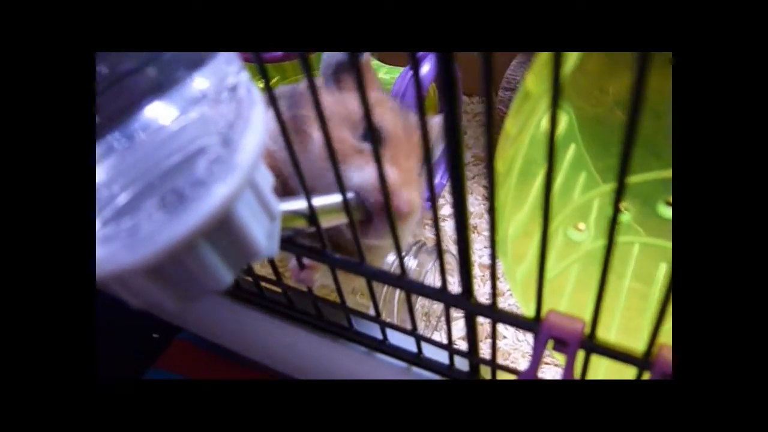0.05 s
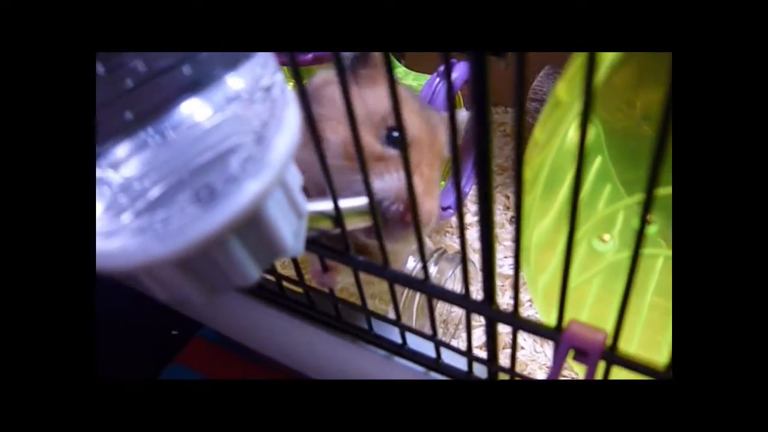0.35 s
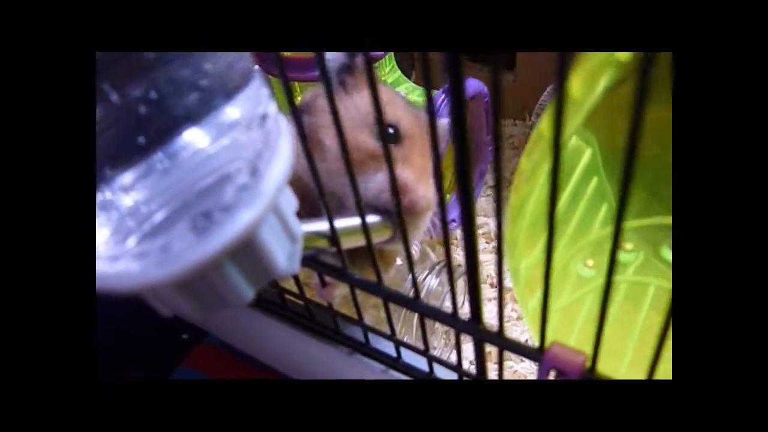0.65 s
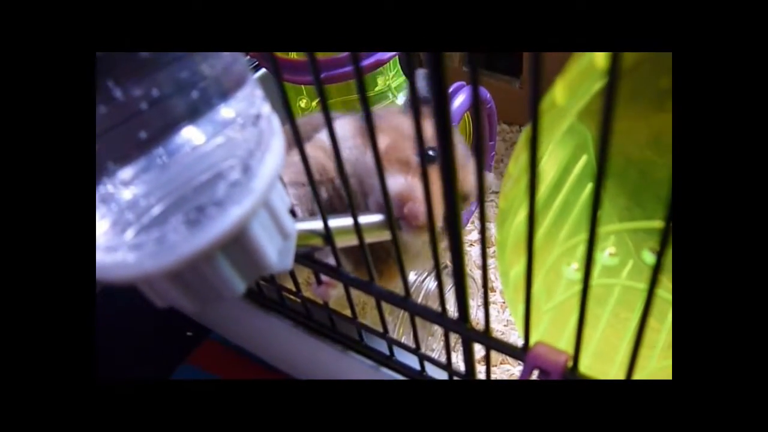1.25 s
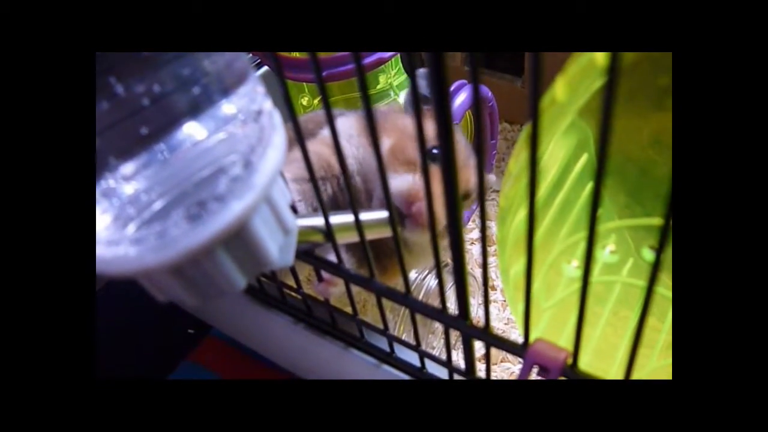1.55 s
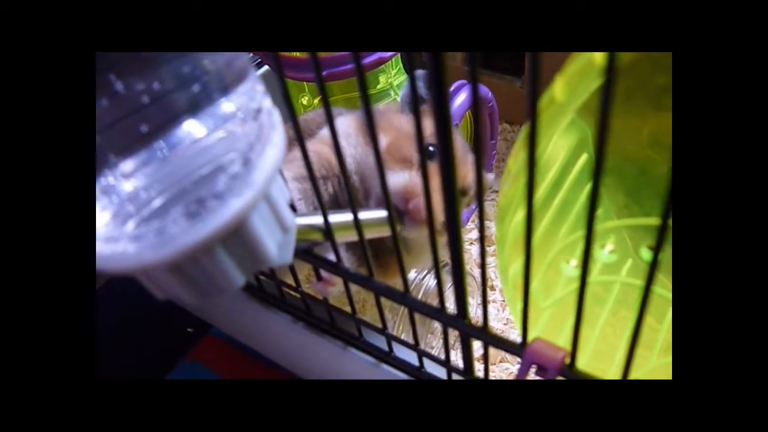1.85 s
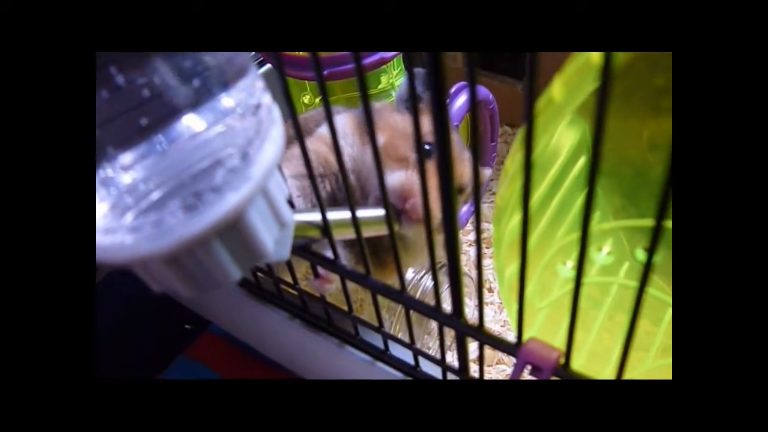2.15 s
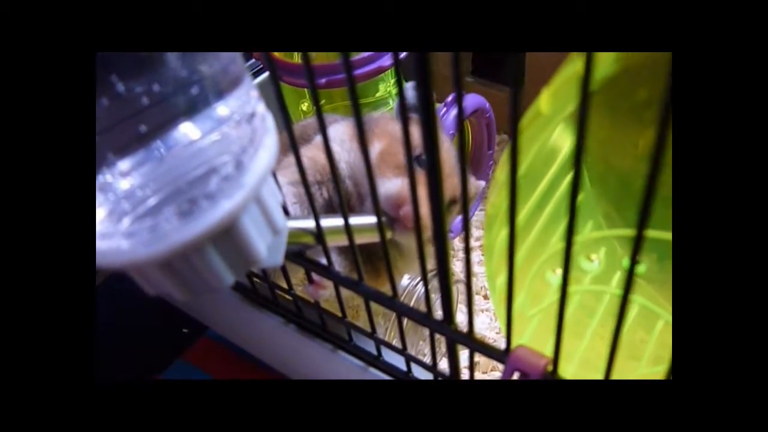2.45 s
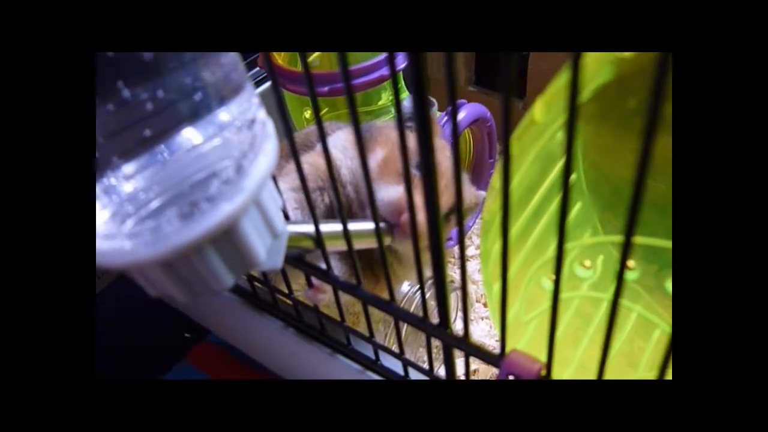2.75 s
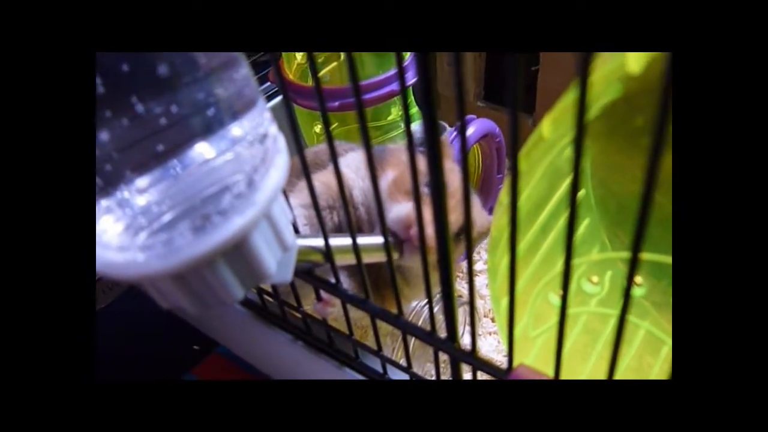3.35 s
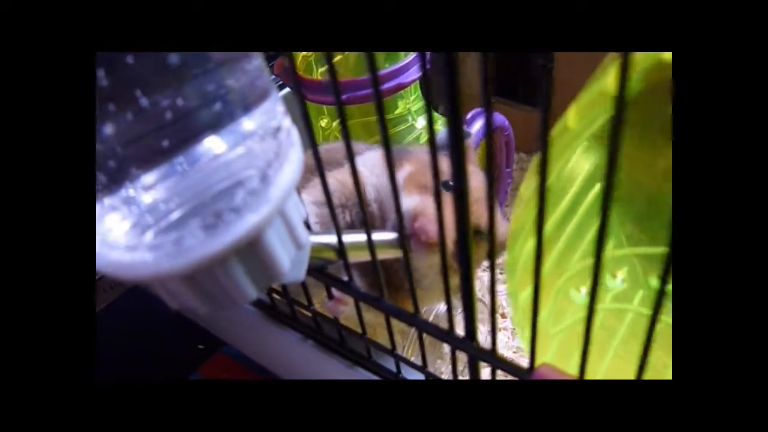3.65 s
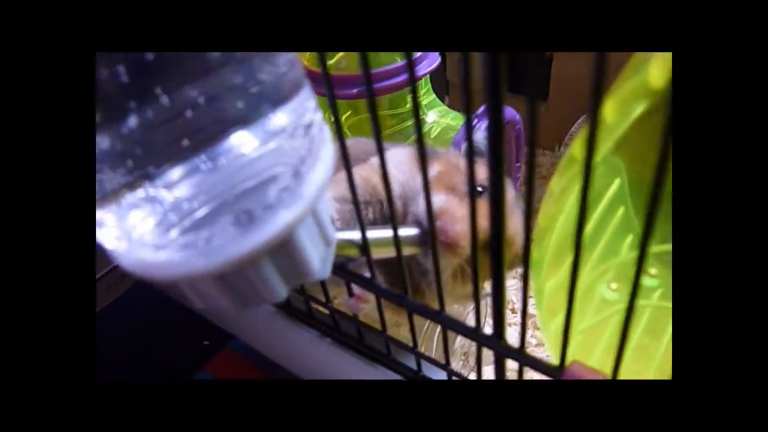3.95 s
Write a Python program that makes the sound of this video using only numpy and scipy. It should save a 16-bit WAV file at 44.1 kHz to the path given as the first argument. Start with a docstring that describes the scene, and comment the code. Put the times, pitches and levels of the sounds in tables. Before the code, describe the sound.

A hamster drinks from a metal bottle spout, with tiny wet ticks, faint rubbing and light irregular knocks that ring the plastic bottle. Soft shuffling at the start fades by about 1.6 seconds. The loudest knock comes near 0.9 seconds. The knocks pause from about 2 to 2.8 seconds while the licking continues, then resume until nearly 4 seconds. Quiet room noise and a very faint electrical whine run underneath.

```python
"""A hamster drinks from the metal spout of a plastic bottle clipped to its cage, in a quiet room.
Room noise, a faint electrical whine and the muzzle rubbing the spout run from the start.
A soft shuffling opens the scene and is gone by 1.64 s as the hamster settles. Over it and after it,
knocks of the spout ring the bottle and its mount, and tongue and teeth make small wet ticks.
The knocks pause from about 2 to 2.8 s while the licking goes on, then resume."""
import sys
import numpy as np
from scipy import signal
from scipy.fft import rfft, irfft
from scipy.io import wavfile

SR = 44100
rng = np.random.default_rng(int(sys.argv[2]) if len(sys.argv) > 2 else 0)


def to_wav(sig):
    """Store sig (one row per channel, or 1-D mono) as 16-bit WAV at the path in sys.argv[1].

    Samples outside -1..1 are clipped; the rate is SR.
    """
    pcm = np.clip(np.atleast_2d(sig), -1, 1) * 32767
    pcm = np.round(pcm).astype(np.int16)
    wavfile.write(sys.argv[1], SR, pcm.T)  # frames by channels


N = 176400
T = np.arange(N) / SR

# plastic bottle (frequency [Hz], level [dB], t60 [s])
BOTTLE_MODES = [(351, -23, 0.079), (518.3, -16, 0.093), (830, -17.5, .02), (958, -18.5, 0.081),
                (1031.4, -11.5, .07), (1142, -9, 0.078), (1156, -5, 0.059), (1280, -19.5, 0.026),
                (1755, -12, 0.078), (1880, -11.5, .07), (2130, -22.5, 0.069), (2698, -19.5, 0.075),
                (3065, -26.5, .03), (3324, -21, 0.052)]
# metal spout (frequency [Hz], level [dB], t60 [s])
SPOUT_MODES = [(3140, -5.5, 0.029), (3350, -10, 0.029), (4570, -7, 0.03), (4660, -7.5, 0.026),
               (4856, -4, 0.025), (4900, -7.5, 0.025), (6350, -14, .035), (6740, -12.5, 0.045)]
# clip and bars holding the bottle (frequency [Hz], level [dB], t60 [s])
MOUNT_MODES = [(463, -5, .08), (590, -7, 0.028), (671, -1.5, 0.065), (746, 3.5, .06), (845, -10.5, 0.031),
               (924, -6.5, 0.033), (1036, -3.5, 0.24)]


def undb(db):
    """Decibels to gain."""
    return 10 ** (np.asarray(db) / 20)


def unit(x):
    """Scale to rms 1."""
    return x / np.sqrt(np.mean(x ** 2))


def decay(t, t60_s):
    """Exponential decay, 60 dB down at t60_s."""
    return np.exp(-np.log(1000) * t / t60_s)


def band(x, hz, width_hz):
    """Two resonators in series, gain 1 at the centre."""
    b, a = signal.iirpeak(min(hz, SR / 3), hz / min(width_hz, SR / 3), fs=SR)
    return signal.lfilter(b, a, signal.lfilter(b, a, x))


def add(out, start_s, x):
    """Mix x into out from start_s."""
    i = max(int(start_s * SR), 0)
    out[i:i + len(x)] += x[:N - i]


def burst(hz, width_hz, t60_s, size=8192):
    """Decaying band of noise with the energy of its envelope."""
    envelope = decay(T[:size], t60_s)
    noise = band(rng.standard_normal(size) * envelope, hz, width_hz)
    return noise * np.sqrt(np.sum(envelope ** 2) / np.sum(noise ** 2))


def ring(modes, detune=0.002, pitch_ratio=1, tilt_db_per_oct=0, size=8192):
    """A body's modes after one push, each randomly detuned; low modes build up more slowly."""
    rise_cycles = 1.5
    t = T[:size]
    out = np.zeros(size)
    for (hz, db, t60_s), scatter in zip(modes, rng.standard_normal(len(modes))):
        gain = undb(db + tilt_db_per_oct * np.log2(hz / 1000))
        rise = 1 - np.exp(-t * hz / rise_cycles)
        tuned_hz = hz * pitch_ratio * (1 + detune * scatter)
        out += gain * decay(t, t60_s) * rise * np.sin(2 * np.pi * tuned_hz * t)
    return out


def room_noise():
    """Steady noise, strongest in the low hundreds of Hz."""
    # (frequency [Hz], relative density [dB])
    spectrum = [(20, -19.5), (45, -12), (90, -3.5), (165, 1.5), (260, 0.5), (420, -2.5), (750, -6),
                (1000, -7.5), (1400, -12), (2300, -15.5), (3800, -20), (5500, -21), (7000, -22.5),
                (8000, -26)]
    hz, db = np.array(spectrum).T
    bin_hz = np.arange(N // 2 + 1) * SR / N
    shape = undb(np.interp(np.log(bin_hz + 1), np.log(hz), db))
    return undb(-56) * unit(irfft(rfft(rng.standard_normal(N)) * shape, N))


def whine():
    """Electrical whine: thin steady tones."""
    # (frequency [Hz], rms level [dB])
    tones = [(1023, -77), (6223, -89.5), (6666, -87), (7707, -95)]
    return sum(undb(db) * np.sqrt(2) * np.sin(2 * np.pi * (hz * T + rng.random())) for hz, db in tones)


def slips(rate_per_s=650, scatter_db=3):
    """Friction: a dense, uneven train of tiny contacts."""
    hits = rng.random(N) < rate_per_s / SR
    return hits * rng.choice([-1, 1], N) * undb(scatter_db * rng.standard_normal(N))


def shuffle(end_s=1.64, fade_s=0.75):
    """Paws rustle and stir the cage, fading as the hamster settles."""
    activity = np.clip((end_s - T) / fade_s, 0, 1)
    paws = slips()
    rustle = unit(band(paws, hz=713, width_hz=410))
    cage = unit(band(paws, hz=957, width_hz=100))
    return undb(-65.5) * activity * (rustle + undb(-1.5) * cage)


def rub(size):
    """Slips crackle and ring bottle, spout and mount; each press detunes the modes differently."""
    contacts = slips()[:size]
    bottle, spout, mount = (unit(signal.fftconvolve(contacts, ring(modes, detune=0.013))[:size])
                            for modes in (BOTTLE_MODES, SPOUT_MODES, MOUNT_MODES))
    crackle = unit(band(contacts, hz=3750, width_hz=10000))
    return bottle + undb(-14.5) * spout + undb(-6.5) * mount + undb(-13) * crackle


def rubbing(rest_db=-72):
    """The muzzle rubs the spout throughout; each spell of licking swells and fades."""
    # (centre time [s], length [s], level [dB])
    spells = [(0.331, 0.039, -67.5), (0.489, 0.034, -68), (0.82, 0.03, -63), (0.912, 0.05, -52.5),
              (1.054, 0.037, -61), (1.185, 0.034, -58.5), (1.57, 0.069, -62), (1.65, 0.043, -61),
              (1.73, 0.026, -61.5), (1.803, 0.04, -57.5), (1.956, 0.051, -61.5), (2.265, 0.035, -63.5),
              (2.361, 0.043, -65.5), (2.428, 0.063, -63), (2.606, 0.059, -61), (2.861, 0.023, -57),
              (2.922, 0.037, -62), (3.1, 0.058, -65.5), (3.22, 0.044, -58), (3.422, 0.083, -62),
              (3.49, 0.068, -58.5), (3.577, 0.038, -60.5), (3.667, 0.038, -57.5), (3.822, 0.062, -61)]
    out = undb(rest_db) * rub(N)
    t = T[:N // 16]
    middle_s = t.mean()
    for time_s, length_s, db in spells:
        swell = np.exp(-2 * ((t - middle_s) / length_s) ** 2)
        add(out, time_s - middle_s, undb(db) * swell * rub(len(t)))
    return out


def mount_thud():
    """The knocked mount: low modes of alternating sign and a short dull rattle."""
    modes = sum((-1) ** k * ring([mode]) for k, mode in enumerate(MOUNT_MODES))
    rattle = burst(hz=590, width_hz=1200, t60_s=0.1)
    return modes / 2 + undb(-7) * rattle


def spout_knocks():
    """Each knock rings the bottle, pings the spout, clicks at the contact and thuds the mount."""
    # (time [s], ring [dB], ring note [Hz], ring tilt [dB/oct], ping [dB], click [dB],
    #  click centre [Hz], thud [dB])
    knocks = [(.014, -43, 1170, -5.5, -72, -67, 3000, -58), (.12, -53, 1170, -4, -78, -70, 3000, -62),
              (.232, -51, 1160, -9, -73, -74, 3000, -67), (.294, -51, 1070, -5, -71, -72, 3000, -54),
              (0.314, -59, 1130, -7, -74, -74, 3020, -48), (0.375, -58, 1110, -4, -69, -66, 3000, -63),
              (.452, -57, 1140, 2, -75, -70, 3030, -53), (.478, -44, 1156, -5, -73, -72, 3000, -61),
              (.5782, -37, 1165, -6.5, -63, -53, 2400, -43.5),
              (0.5883, -57, 1190, -15, -75, -67, 2420, -47),
              (0.7725, -42, 1173, -5.5, -73, -54.5, 2600, -72),
              (.905, -31.5, 1156, -2, -43, -53, 4300, -52), (0.9069, -52, 1210, 4, -55, -45, 3210, -59),
              (1.0242, -44, 1170, -2.5, -66, -58, 2780, -59), (1.0517, -46, 1135, -6, -51, -47, 6150, -49),
              (1.173, -57, 1160, -5, -57, -54.5, 6000, -57), (1.562, -58, 1120, -11, -72, -57, 4000, -52),
              (1.799, -45, 1140, 1, -64, -59, 4000, -55.5), (1.875, -48, 1160, -4, -74, -66, 3000, -64),
              (1.946, -53, 1187, 3, -70, -70, 4000, -68), (2.848, -59, 1207, -5, -64, -52, 4200, -56),
              (2.853, -53, 1140, 7, -63, -48.5, 2540, -59), (2.862, -54, 1162, 5, -65, -60, 4000, -55),
              (2.934, -52, 1080, -1, -73, -63, 4000, -70), (3.115, -52, 1140, -4, -67, -56, 4500, -60),
              (3.217, -53, 1170, 0, -72, -68, 4000, -55), (3.286, -49, 1160, -2, -78, -63, 4000, -56),
              (3.472, -58, 1105, -4, -59, -51.5, 2770, -50), (3.501, -51, 1194, 1, -64, -55, 4500, -50.5),
              (3.563, -48.5, 1160, 4, -54, -52, 5430, -54), (3.6599, -46.5, 1160, 5, -56, -53, 4960, -53),
              (3.675, -72, 1210, -10, -72, -65, 4000, -63)]
    bottle_note_hz = 1164  # the animal's weight on the spout shifts it
    out = np.zeros(N)
    for time_s, ring_db, ring_hz, tilt, ping_db, click_db, click_hz, thud_db in knocks:
        pitch_ratio = ring_hz / bottle_note_hz
        bottle = undb(ring_db) * ring(BOTTLE_MODES, pitch_ratio=pitch_ratio, tilt_db_per_oct=tilt)
        ping = undb(ping_db) * ring(SPOUT_MODES)
        click = undb(click_db) * burst(click_hz, width_hz=0.95 * click_hz, t60_s=0.011)
        thud = undb(thud_db) * mount_thud()
        add(out, time_s, bottle + ping + click + thud)
    return out


def wet_ticks():
    """Tongue and teeth make tiny bright smacks that lightly ring the bottle."""
    # (time [s], level [dB], centre [Hz])
    ticks = [(0.111, -52, 3000), (0.28, -69, 4500), (0.302, -56, 5000), (0.459, -57, 3200),
             (0.523, -59, 3300), (0.573, -52, 3200), (0.893, -67, 3200), (0.93, -54, 5800),
             (1.048, -47, 3000), (1.063, -60, 5200), (1.104, -59, 4200), (1.211, -49, 3400),
             (1.319, -48, 3050), (1.35, -56, 3200), (1.422, -50, 2700), (1.622, -55, 4500),
             (1.724, -61, 5000), (1.729, -53, 4500), (1.953, -71, 4000), (2.341, -60, 3500),
             (2.414, -55, 4800), (2.511, -57, 6000), (2.656, -56, 5600), (2.675, -59, 6000),
             (2.7007, -57.5, 6000), (2.742, -56, 5000), (2.914, -56, 5500), (2.928, -58, 6000),
             (3.096, -53, 5000), (3.266, -52, 4800), (3.386, -62, 4500), (3.7147, -56, 4500),
             (3.801, -54, 4500), (3.838, -55, 4500)]
    out = np.zeros(N)
    for time_s, db, hz in ticks:
        smack = burst(hz, width_hz=0.6 * hz, t60_s=0.0069)
        add(out, time_s, undb(db) * (smack + undb(-4) * ring(BOTTLE_MODES)))
    return out


def reverb(x):
    """Add a short, faint tail from cage and walls."""
    tail = rng.standard_normal(N // 8) * decay(T[:N // 8], t60_s=0.12)
    tail /= np.sqrt(np.sum(tail ** 2))
    return x + undb(-16) * signal.fftconvolve(x, tail)[:N]


def scene():
    """The drinking hamster in its room, mono."""
    hamster = spout_knocks() + wet_ticks() + rubbing() + shuffle()
    return (reverb(hamster) + room_noise() + whine())[None]


def record(dry):
    """Constant offset and a steep treble cut."""
    dc_offset, cutoff_hz = -0.0356, 7650
    hz = np.arange(N // 2 + 1) * SR / N
    lowpass = 1 / np.sqrt(1 + (hz / cutoff_hz) ** 80)
    return irfft(rfft(dry + dc_offset) * lowpass, N)


dry = scene()
out = record(dry)
to_wav(out)
```